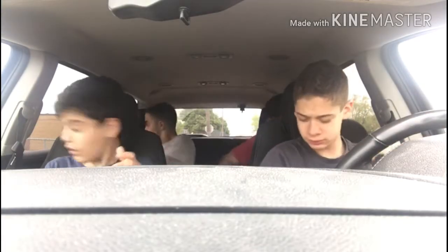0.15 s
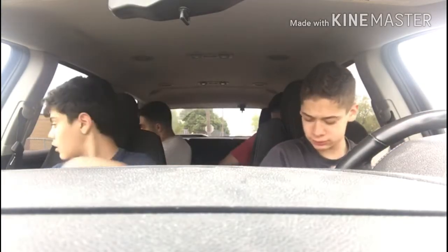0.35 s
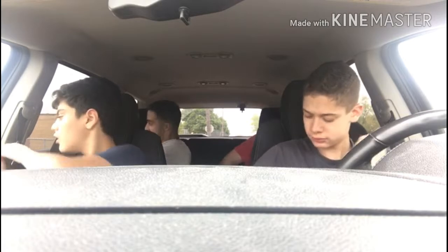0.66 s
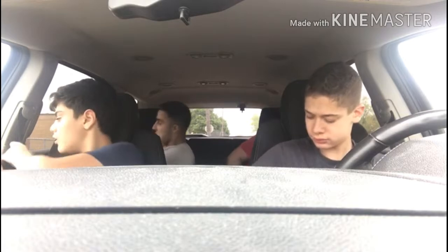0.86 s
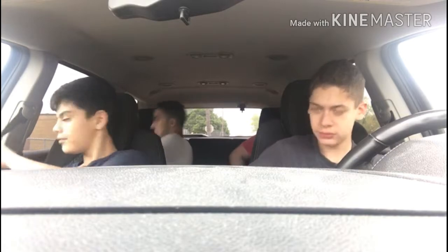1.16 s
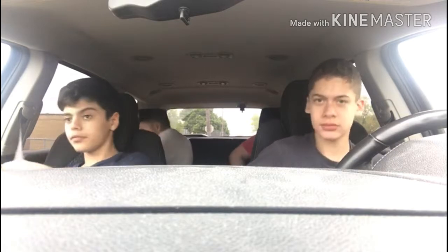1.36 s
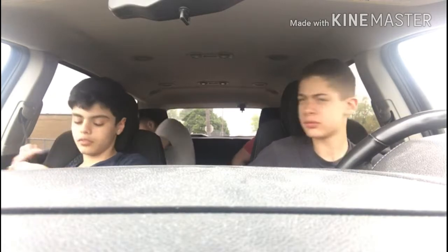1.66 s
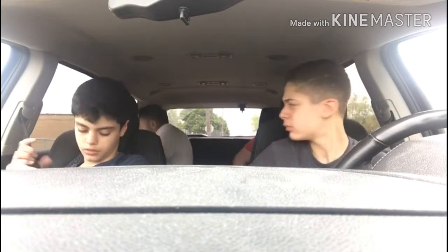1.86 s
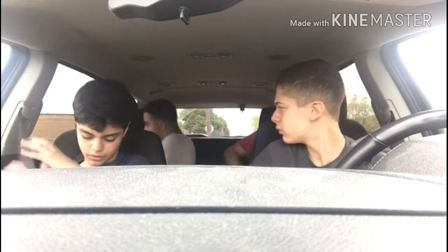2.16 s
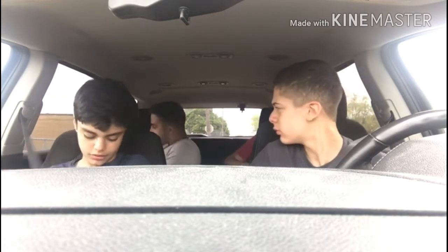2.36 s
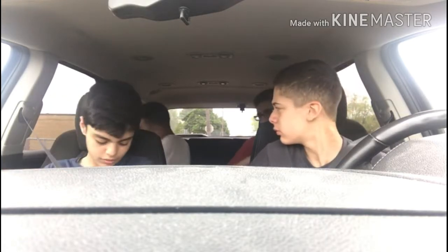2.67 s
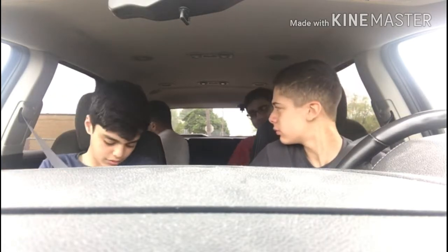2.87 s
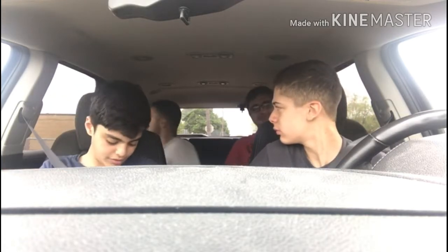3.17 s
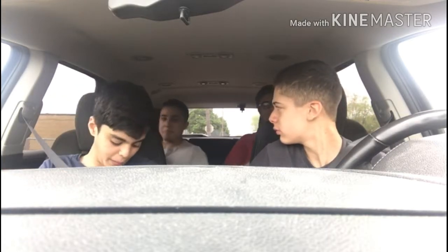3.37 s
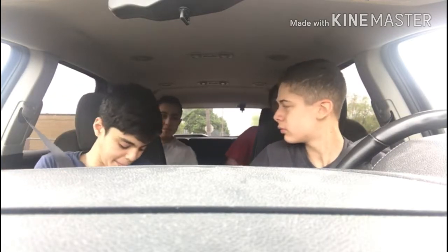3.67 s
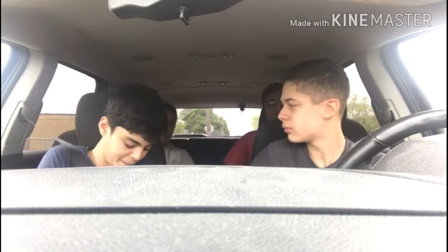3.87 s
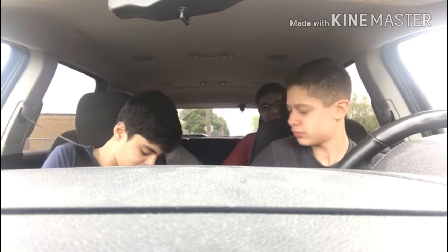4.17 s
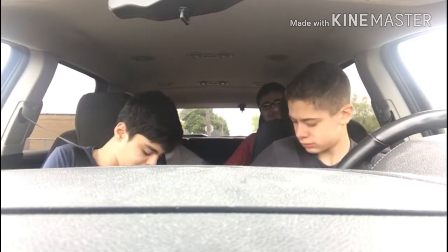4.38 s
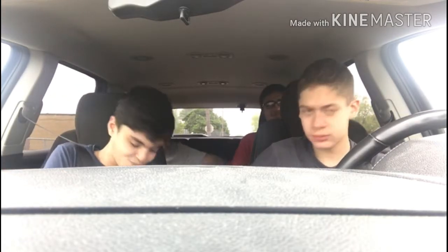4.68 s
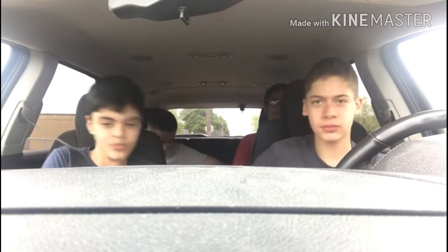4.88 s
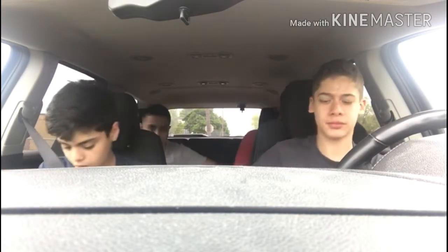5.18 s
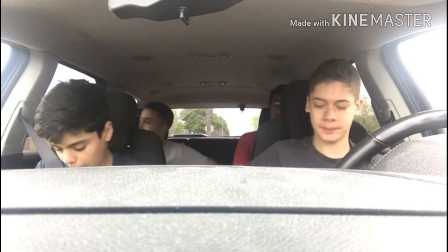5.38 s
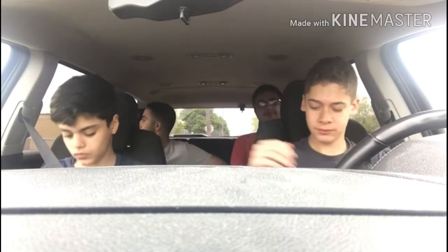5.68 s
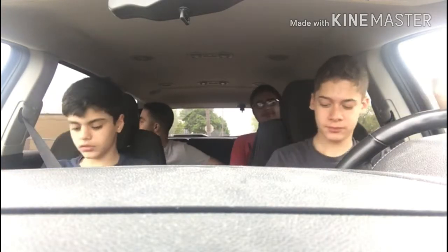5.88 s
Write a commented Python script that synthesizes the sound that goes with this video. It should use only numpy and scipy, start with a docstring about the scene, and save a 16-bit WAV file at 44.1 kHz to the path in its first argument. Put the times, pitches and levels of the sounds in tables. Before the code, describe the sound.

A phone on the dashboard of a parked car picks up a dull outside hum and low rumbling, rustling bodies on seats. Soft hollow thumps strike door trim and seats, with a boomy cabin resonance. A very short rub of belt webbing follows at about one second, then latches and buckles click. A quieter stretch with faint ticks leads to clearer clicks and a few last thumps.

```python
"""Inside a parked car, a phone microphone on the dashboard: people reach for their seatbelts and buckle up.
From the start a dull hum of outside noise (coloured noise) fills the cabin, and bodies rumble and rustle on seats.
Elbows and buckles soon thump trim and seats (damped modes) and set the cabin air booming (two beating modes);
each thump shakes loose hard parts. Then latches and tongues click (noise bursts and ringing modes), and after
a second webbing rubs through its guide (stick-slip pulses through resonances)."""
import sys
import numpy as np
from scipy import signal
from scipy.fft import rfft, irfft, next_fast_len
from scipy.io import wavfile
from scipy.ndimage import uniform_filter1d, map_coordinates

SR = 44100
rng = np.random.default_rng(int(sys.argv[2]) if len(sys.argv) > 2 else 0)


def put_to_file(sound):
    """Save the sound as 16-bit audio at rate SR, in the file named by the first command-line argument."""
    columns = np.atleast_2d(sound).T  # one column per channel
    safe = np.clip(columns, -1, 1)
    whole_steps = np.round(safe * 32767)
    wavfile.write(sys.argv[1], SR, whole_steps.astype(np.int16))


N = 265482  # length in samples


def amp(db):
    """Amplitude factor of a level in dB."""
    return 10 ** (np.asarray(db) / 20)


def unit(x):
    """x scaled to rms 1."""
    return x / np.sqrt(np.mean(x ** 2) + 1e-20)


def curves(rows):
    """One value per sample for each column after the time; the end values hold outside."""
    s, *cols = np.transpose(rows)
    return [np.interp(np.arange(N) / SR, s, c) for c in cols]


def wobble(rate):
    """A smooth random curve with rate knots a second."""
    knots = rng.standard_normal(int(N * rate / SR) + 4)
    return map_coordinates(knots, [np.arange(N) * rate / SR])


def filtered(x, response):
    """x passed through a complex response of frequency."""
    m = next_fast_len(N + SR // 2)
    hz = np.fft.rfftfreq(m, 1 / SR)
    return irfft(rfft(x, m) * response(hz), m)[..., :N]


def noise(spectrum):
    """Noise of rms 1 coloured by (f/Hz, level/dB) points on a log frequency axis."""
    f, db = np.transpose(spectrum)

    def colour(hz):
        return amp(np.interp(np.log(hz + 1), np.log(f + 1), db))

    return unit(filtered(rng.standard_normal(N), colour))


def patchy(x, depth_db):
    """Random louder and softer patches in time and frequency, at rms 1."""
    z = signal.stft(x, nperseg=512)[2]
    field = uniform_filter1d(rng.standard_normal(z.shape), size=3, axis=0)
    field = uniform_filter1d(field, size=6, axis=1)
    return unit(signal.istft(z * amp(depth_db * unit(field)), nperseg=512)[1][:N])


def swell(t, rise):
    """Gradual onset of a soft contact, from 0 to 1 in about rise seconds."""
    return 1 - np.exp(-(t / rise) ** 2)


def ring(modes, t, rise, scatter_db):
    """Damped modes that swell while the contact lasts, at new strengths and phases for each blow."""
    hz, db, t60 = np.transpose(modes)[:, :, None]
    luck = rng.standard_normal((3, len(modes), 1))
    hz = hz * (1 + 0.027 * luck[2])  # a different grip and spot detune the modes a little
    decay = amp(db + scatter_db * luck[0] - 60 * t / t60)
    tones = decay * np.sin(2 * np.pi * hz * t + 2 * luck[1])
    return swell(t, rise) * tones.sum(axis=0)


def add(track, s, sound):
    """Lay a sound into a track at time s."""
    part = track[max(round(s * SR), 0):][:len(sound)]
    part += sound[:len(part)]


# steady outside noise reaching the cabin: f/Hz, level/dB (spectral shape)
HUM_SPECTRUM = [(410, -40.5), (700, -12.5), (779, -15), (857, -1), (899, -2.5), (1040, -8.5), (1070, -18.5),
                (1540, -23), (1730, -28.5), (2300, -28.5), (2790, -31), (4940, -36), (5970, -35.5),
                (11100, -40.5), (12100, -44.5), (15700, -73), (22000, -120)]
HUM_DB = -54


def outside_hum():
    """A dull, nearly steady hum: coloured noise with slight patches."""
    return amp(HUM_DB) * patchy(noise(HUM_SPECTRUM), depth_db=1.84)


# bodies shifting on the seats: t/s, level/dB (only differences from the mean count)
BODY_MOVEMENT = [(0.0, -39.5), (0.47, -37.5), (0.79, -42), (1.07, -38), (1.27, -39), (1.41, -39),
                 (1.73, -37), (1.96, -34.5), (2.13, -34), (2.31, -36.5), (2.77, -40), (3.03, -42.5),
                 (4.12, -38.5), (4.43, -43), (5.37, -42.5), (5.75, -35.5), (6.02, -40.5)]
# low rumble of shifting bodies: f/Hz, level/dB (spectral shape)
RUMBLE_SPECTRUM = [(15, -42.5), (25, -17), (43, 0), (65, -3), (97, 3), (180, -9.5), (230, -42), (400, -120)]
# mid rustle on the seats: f/Hz, level/dB (spectral shape)
RUSTLE_SPECTRUM = [(94, -27), (160, -3.5), (184, 0.5), (318, -1), (432, -5.5), (529, -0.5), (631, -11),
                   (720, -21.5), (940, -41.5), (1580, -120)]
# clothes brushing: f/Hz, level/dB (spectral shape)
CLOTH_SPECTRUM = [(900, -42), (1200, 0), (1600, -3), (2500, -1.5), (3300, -30), (4500, -20), (9000, -95.5)]
RUMBLE_DB, RUSTLE_DB, CLOTH_DB = -40.5, -44.5, -73  # at average movement
RUMBLE_GROWS, RUSTLE_GROWS, CLOTH_GROWS = 0.68, 0.61, 0.53  # dB per dB of movement


def bodies_on_seats():
    """Lumpy noises of weight, seat and cloth whose levels follow the movement on the seats."""
    movement_db, = curves(BODY_MOVEMENT)
    movement_db = movement_db - movement_db.mean()
    lumps = wobble(12)  # shared by rumble and rustle
    rumble = unit(amp(0.6 * lumps + 1.3 * wobble(4)) * noise(RUMBLE_SPECTRUM))
    rustle = unit(amp(0.91 * lumps + 2.0 * wobble(30)) * noise(RUSTLE_SPECTRUM))
    cloth = unit(amp(5.6 * wobble(25) + 1.3 * wobble(150)) * noise(CLOTH_SPECTRUM))
    return (amp(RUMBLE_DB + RUMBLE_GROWS * movement_db) * rumble
            + amp(RUSTLE_DB + RUSTLE_GROWS * movement_db) * rustle
            + amp(CLOTH_DB + CLOTH_GROWS * movement_db) * cloth)


# two air modes of the cabin: f/Hz, level/dB, t60/s
CABIN_AIR = [(54.76, -3, 0.45), (67.8, 0.5, 0.22)]


def cabin_boom(t):
    """Two air modes start in opposition, so their beat swells, cancels and returns."""
    low, high = [amp(db - 60 * t / t60) * np.cos(2 * np.pi * hz * t) for hz, db, t60 in CABIN_AIR]
    return swell(t, 0.015) * (low - high)


# thumps on trim and seats: t/s, blow level/dB, contact/s, hardness/dB (upper trim modes re blow),
# boom/dB and seat/dB (re blow, before fixed offsets), rattle of loose parts/dB,
# low and high note of the struck spot f/Hz (before random detuning)
THUMPS = [(0.192, -7, 0.015, -9.5, -12, -8, -41, 231.4, 414.3),
          (0.255, -25.5, .009, -9.5, -20, 2.5, -67.5, 169, 343),
          (0.528, -15.5, 0.014, -10.5, -5.5, -3, -40.5, 223, 409.6),
          (1.062, -13.5, 0.015, -10, -9.5, -11, -41.5, 314, 345),
          (1.089, -15, 0.0095, -7.5, -24, -19, -56, 261, 485),
          (1.156, -31, .01, -11, -6, -16.5, -62, 271, 418),
          (1.262, -25, 0.0089, -4, -37, -12, -43, 300, 449),
          (1.307, -29.5, .009, -3.5, -7, -9, -63, 234, 592),
          (1.35, -10.5, 0.011, -11.5, -11.5, -13.5, -41.5, 238, 412),
          (1.796, -13.5, .017, -14.5, -7, -9.5, -44.5, 212, 430),
          (2.003, -14, .012, -11.5, -8.5, -23, -46, 242.4, 377),
          (2.154, -34.5, 0.013, 1, 4, -11, -44, 318, 558),
          (2.224, -13, 0.012, -16.5, -17.5, -15.5, -57, 239, 413),
          (2.627, -14, 0.014, -8.5, -9, -8, -42, 225, 339),
          (2.926, -36, 0.0071, -7.5, -27, -6, -57, 265, 494),
          (3.691, -38, 0.0085, -5, -23, 2, -62, 240, 384), (3.874, -35, 0.01, -1, -0.5, -19, -67, 307, 513),
          (3.95, -34.5, 0.016, -2, -9, -14, -57, 172, 351),
          (4.769, -16, 0.016, -10.5, -13.5, -5.5, -46.5, 234, 474),
          (5.098, -31, .01, -20, -22, -10, -65, 210, 545), (5.607, -21.5, 0.012, -9, -9, -4, -55, 230, 336),
          (5.806, -17.5, 0.015, -9.5, -8, -5.5, -48, 223, 378)]
# door trim, low modes: f/Hz, level/dB, t60/s
TRIM_LOW = [(173.9, -6, 0.11), (212.7, -9.5, 0.25), (289.7, -6, 0.078)]
# door trim, high modes: f/Hz, level/dB, t60/s
TRIM_HIGH = [(350.7, -3.5, 0.22), (407.5, -2.5, 0.33), (491, -3.5, 0.15), (569, -14.5, 0.14),
             (658, -14.5, 0.12), (770, -15.5, 0.1), (910, -19.5, 0.14)]
# free mode of the door skin: f/Hz, level/dB, t60/s
DOOR_SKIN = (238, -0.065, 0.23)
# seat frame: f/Hz, level/dB, t60/s
SEAT_FRAME = [(98.9, -0.5, 0.15), (137.2, 1, .13)]
# padding giving way: f/Hz, level/dB (spectral shape)
PADDING_SPECTRUM = [(70, -29.5), (130, -3), (250, -1.5), (520, -4), (700, -18), (1000, -33.5),
                    (2500, -47.5), (6000, -90)]
DOOR_DB, DOOR_GROWS = -3, 0.39  # door skin re blow at a -10.5 dB blow; dB gained per dB of strength
BOOM_LAG_S = 0.0054  # the body panels take a moment to push the air


def thumps():
    """Each soft blow crushes padding and rings trim, door skin and seat; the cabin boom follows late."""
    out, crush = np.zeros(N), np.zeros(N)
    t = np.arange(SR // 2) / SR
    boom = cabin_boom(t)
    for s, db, contact, hard_db, boom_db, seat_db, _, spot_hz, upper_hz in THUMPS:
        damped = 1 / (1 + (t / (3.0 * contact)) ** 4) + 0.54  # the arm resting on the trim smothers it
        # the patch under the blow has its own short notes
        low_modes = TRIM_LOW + [(spot_hz, -2, .08)]
        high_modes = TRIM_HIGH + [(upper_hz, -1.5, .16)]
        trim = ring(low_modes, t, 0.52 * contact, scatter_db=1.5)
        trim += amp(hard_db) * ring(high_modes, t, 0.6 * contact, scatter_db=4.0)
        door_db = DOOR_DB + DOOR_GROWS * (db + 10.5)
        door = amp(door_db) * ring([DOOR_SKIN], t, 0.51 * contact, scatter_db=1.0)
        add(out, s - .006, amp(db) * (damped * trim + door))
        add(crush, s - .006, amp(db - 8.0 - 60 * t / .22) * swell(t, contact))
        seat = ring(SEAT_FRAME, t, 0.013, scatter_db=4.0)
        add(out, s + BOOM_LAG_S + 0.0056, amp(db + seat_db + 5.5) * seat)
        add(out, s + BOOM_LAG_S, amp(db + boom_db + 8.0) * boom)
    return out + crush * noise(PADDING_SPECTRUM)


# clicks of latches, tongues and plastic: t/s, level/dB, brightness/dB and sparkle/dB (re level),
# housing knock/dB, ping f/Hz (levels before fixed offsets, ping before random detuning)
CLICKS = [(0.3909, -63, -13, -17, -27.5, 1200), (0.7382, -60, -19, -13, -27, 1250),
          (0.855, -50, -23, -15, -50, 1260), (1.4094, -52, -4, -17, -42, 2660),
          (1.5894, -46, -15, -24, -56, 2240), (1.619, -56.5, 2.5, -18, -54, 2570),
          (1.6916, -37, -14, -24, -18, 1180), (1.7475, -38, -6.5, -12.5, -27, 2630),
          (1.9684, -54, -19, -27, -26.5, 1470), (2.16, -43.5, -6.5, -23, -20, 4100),
          (2.2614, -46, -24, -23, -25, 1280), (2.2896, -44, -9, -17, -37, 2750),
          (3.411, -56, 0.5, -15, -50, 3240), (3.481, -47, -7, -26, -39, 3100),
          (3.5496, -54, -3, -19, -43, 2790), (3.7762, -50.5, -10, -20, -33, 2350),
          (3.87, -50, -3.5, -26, -40, 2980), (4.0831, -53.5, -2.5, -20, -38, 3200),
          (4.3284, -34, -11, -15, -26, 3170), (4.336, -39.5, -13, -27, -34, 1450),
          (4.5585, -52, -4, -17, -37, 1900), (4.58, -46.5, -8, -16, -34, 1240),
          (4.6014, -48, -14, -12, -28, 1380), (4.8315, -35.5, -4, -3.5, -39, 3010),
          (4.8424, -44, -19, -23, -27.5, 1360), (5.03, -46.5, -7.5, -10, -33, 4640),
          (5.09, -33.5, -3, -7, -30, 2060), (5.2618, -47.5, -6, -7.5, -48, 2000)]
# parts shaken by a thump: brightness/dB and sparkle/dB (re rattle), housing knock/dB (re thump), ping f/Hz
SHAKEN_PARTS = (-13.5, -23.5, -7.5, 2351.5)
# steel tongue, low modes: f/Hz, level/dB, t60/s
TONGUE_LOW = [(1240, -10, 0.15), (1424, -10, 0.11), (1510, -10, 0.046), (1950, -2.5, 0.083)]
# steel tongue, middle modes: f/Hz, level/dB, t60/s
TONGUE_MIDDLE = [(2297, 2.5, .05), (2440, -4.5, 0.058), (2880, -8.5, 0.075), (3730, -2.5, 0.068)]
# steel tongue, high modes: f/Hz, level/dB, t60/s
TONGUE_HIGH = [(4330, -1, 0.057), (4720, -8, 0.05), (5840, -9, 0.02), (7000, -5.5, 0.058), (8300, 2.5, .03)]
# hollow buckle housing: f/Hz, level/dB, t60/s
HOUSING = [(489, 5.5, 0.041), (577, -1.5, 0.084)]
# scuff of a click: f/Hz, level/dB (spectral shape)
SCUFF_SPECTRUM = [(800, -31.5), (1100, 4.5), (1500, 2.5), (2100, -7), (2600, -18), (5000, -88)]
# bright part of a click: f/Hz, level/dB (spectral shape)
BRIGHT_SPECTRUM = [(1500, -39), (2100, -2), (2600, -3), (3800, -10), (4600, -11.5), (9000, -95)]
# treble of a click: f/Hz, level/dB (spectral shape)
SPARKLE_SPECTRUM = [(2240, -34.5), (3800, -9.5), (5690, 0), (7380, -5.5), (8170, -6), (12000, -18.5),
                    (15600, -53), (22000, -120)]
RATTLE_S = 0.012  # decay time of a click's burst
SHAKE_LEAD_S, SHAKE_LASTS = 0.00297, 1.33  # shaken parts: lead before the thump time; decay in contact times


def hard_contacts():
    """Every click, and the same parts shaken by every thump, as click rows with a rattle time/s added."""
    bright, sparkle, knock, ping = SHAKEN_PARTS
    shaken = [(s - SHAKE_LEAD_S, loose_db, bright, sparkle, db + knock, ping, SHAKE_LASTS * contact)
              for s, db, contact, *_, loose_db, _, _ in THUMPS]
    return shaken + [tuple(row) + (RATTLE_S,) for row in CLICKS]


def clicks():
    """A short grainy rattle of hard parts rings the tongue's modes and knocks the hollow housing."""
    bursts, rings = np.zeros((3, N)), np.zeros(N)
    t = np.arange(SR // 6) / SR
    bands = TONGUE_LOW, TONGUE_MIDDLE, TONGUE_HIGH
    for s, db, bright_db, sparkle_db, knock_db, ping_hz, rattle in hard_contacts():
        burst = swell(t, 0.0047) * (np.exp(-(t / rattle) ** 2) + 0.14 * np.exp(-t / 0.032))
        levels = db, db + bright_db, db + sparkle_db
        for track, modes, level in zip(bursts, bands, levels):
            add(track, s - .003, amp(level - 7.5) * burst)
            add(rings, s - .002, amp(level - 12.0) * ring(modes, t, 0.0016, scatter_db=2.5))
        # the loose part that was hit rings clearest
        ping_db = db - 7.5 if ping_hz < 2100 else db + bright_db - 6
        add(rings, s + 0.0016, amp(ping_db) * ring([(ping_hz, 0, .07)], t, 0.0041, scatter_db=1.8))
        add(rings, s + 0.0013, amp(knock_db - 2.0) * ring(HOUSING, t, 0.49 * rattle, scatter_db=2.0))
    grain = unit(amp(2.16 * wobble(250)))  # many small contacts inside one rattle
    scuff = bursts[0] * noise(SCUFF_SPECTRUM)
    bright = bursts[1] * noise(BRIGHT_SPECTRUM)
    sparkle = bursts[2] * noise(SPARKLE_SPECTRUM)
    return rings + grain * (scuff + bright + sparkle)


# slips of webbing through its guide: t/s, level/dB (4.5 dB is taken off), length/s
SLIPS = [(1.074, -42.5, 0.0087), (1.099, -39, 0.013), (1.136, -43.5, 0.017), (1.155, -43.5, 0.013),
         (1.161, -50, 0.023)]
# resonances of the belt guide: f/Hz, width/Hz, level/dB
GUIDE = [(947, 63, 5), (1350, 100, -5), (1860, 130, -4.5), (2410, 410, -12), (2950, 150, -17)]
SQUEAK_HZ = 463  # mean catches of the weave a second


def guide_response(hz):
    """Parallel resonances of the belt guide, with alternating sign."""
    total = 0
    for k, (centre, width, db) in enumerate(GUIDE):
        band = 1j * hz * width / (centre ** 2 - hz ** 2 + 1j * hz * width)
        total = total + (-1) ** k * amp(db) * band
    return total


def webbing():
    """The belt slips in short strokes whose stick-slip grain excites the resonances of its guide."""
    t = np.arange(N) / SR
    strokes = sum(amp(db - 4.5) * np.exp(-((t - s - length / 2) / length) ** 2) for s, db, length in SLIPS)
    turns = np.cumsum(SQUEAK_HZ * (1 + .03 * wobble(60))) / SR
    # stick and slip over the weave: one uneven pulse per whole turn
    catches = np.diff(np.floor(turns), prepend=0) * amp(2.5 * rng.standard_normal(N))
    hiss = 1.7 * rng.standard_normal(N) * amp(1.8 * wobble(300))
    return strokes * unit(filtered(unit(catches) + hiss, guide_response))


def scene():
    """All sources in the cabin, summed to one channel."""
    cabin = outside_hum() + bodies_on_seats()
    return (cabin + thumps() + clicks() + webbing())[None]


TOP_HZ = 12100  # band limit of the phone


def record(dry):
    """The phone cuts steeply above its band limit."""
    return filtered(dry, lambda hz: 1 / (1 + (hz / TOP_HZ) ** 60))


dry = scene()
out = record(dry)
put_to_file(out)
```